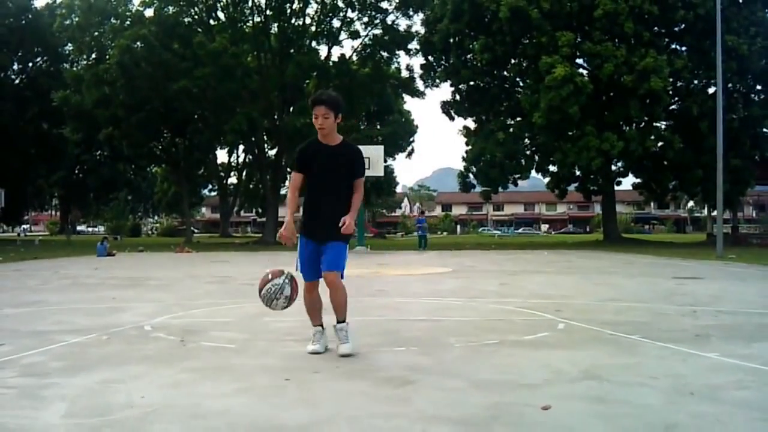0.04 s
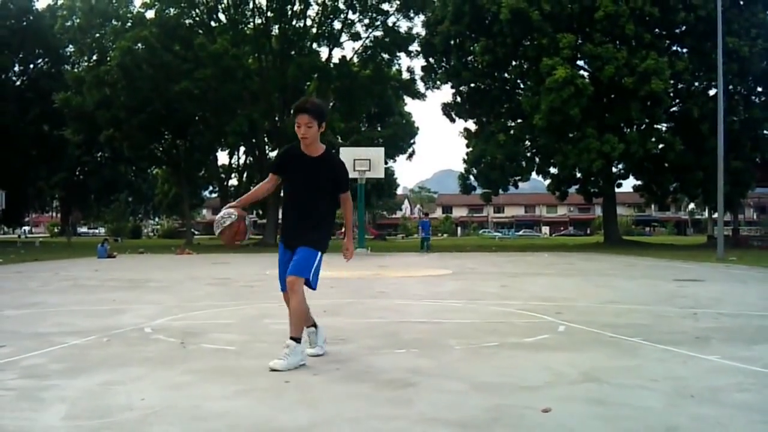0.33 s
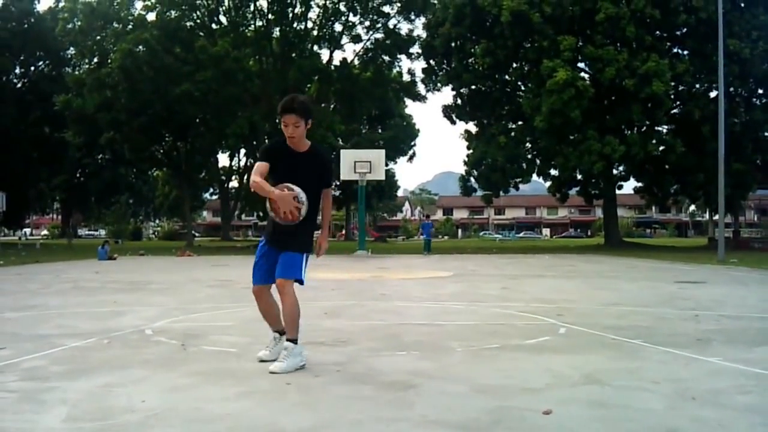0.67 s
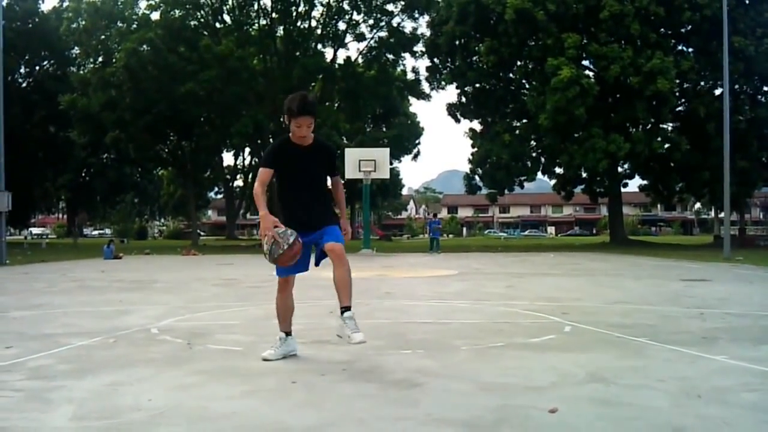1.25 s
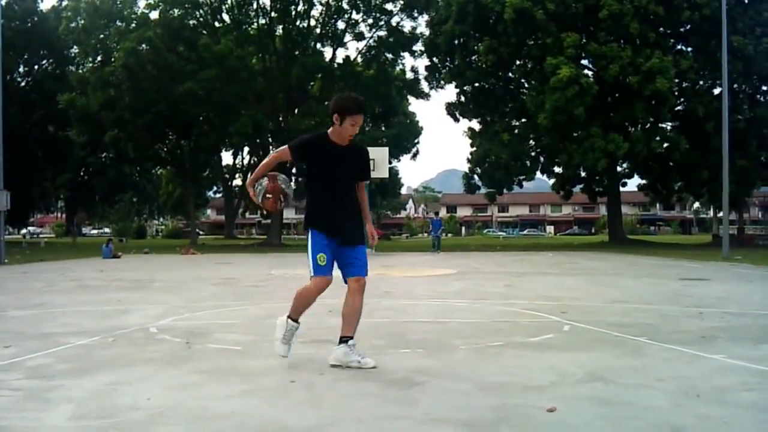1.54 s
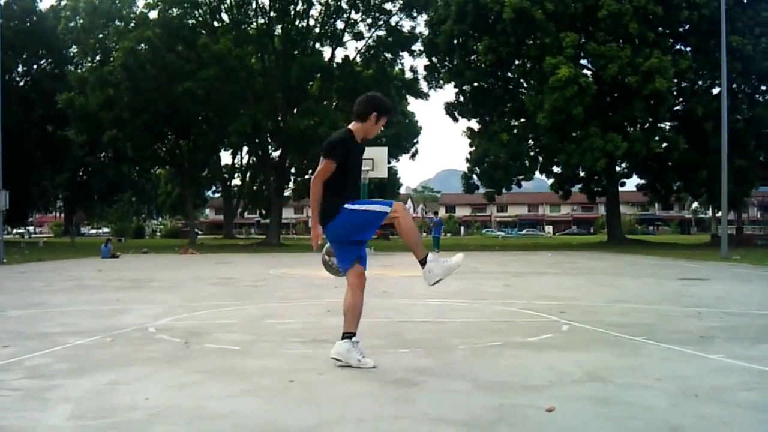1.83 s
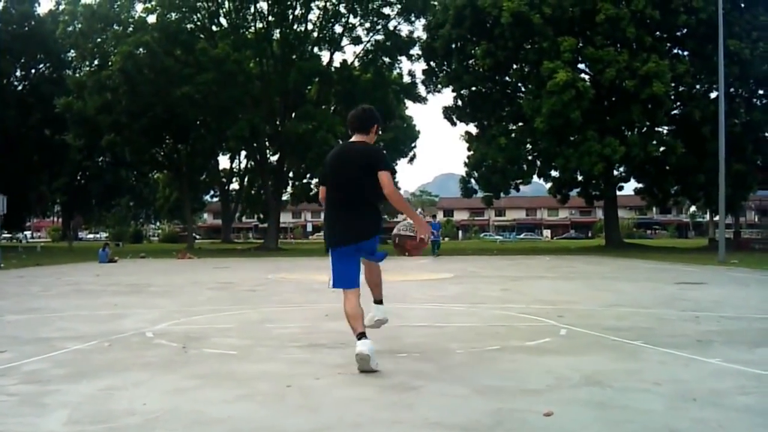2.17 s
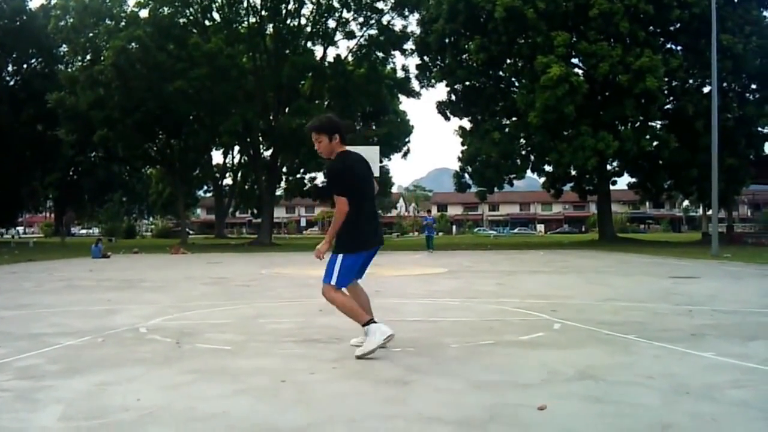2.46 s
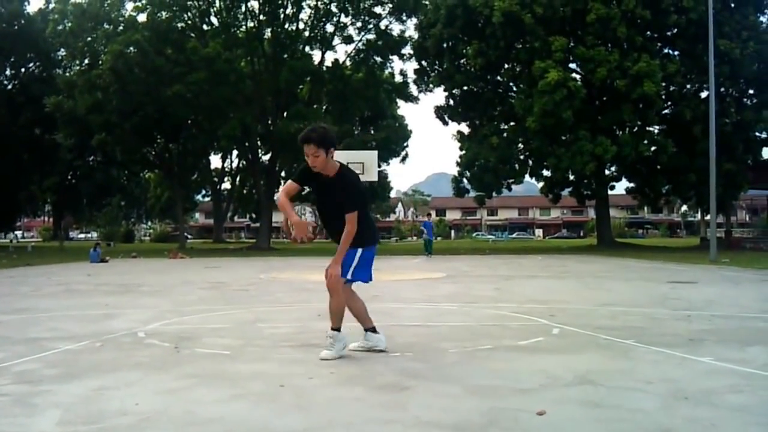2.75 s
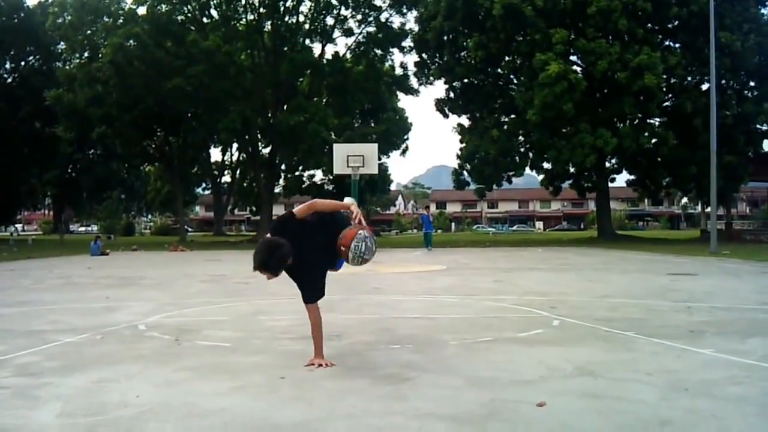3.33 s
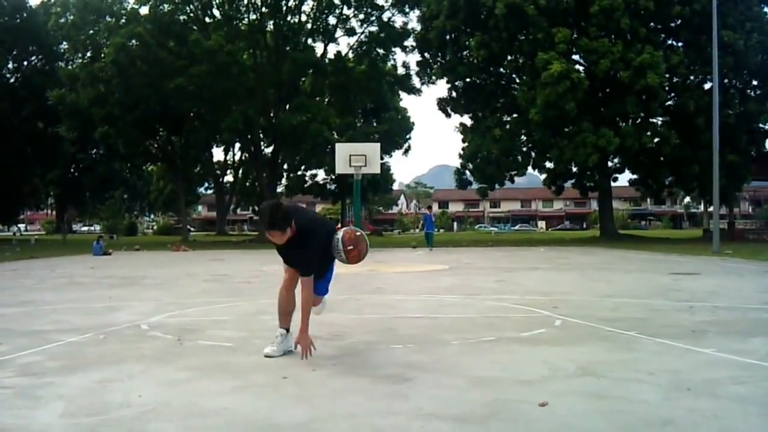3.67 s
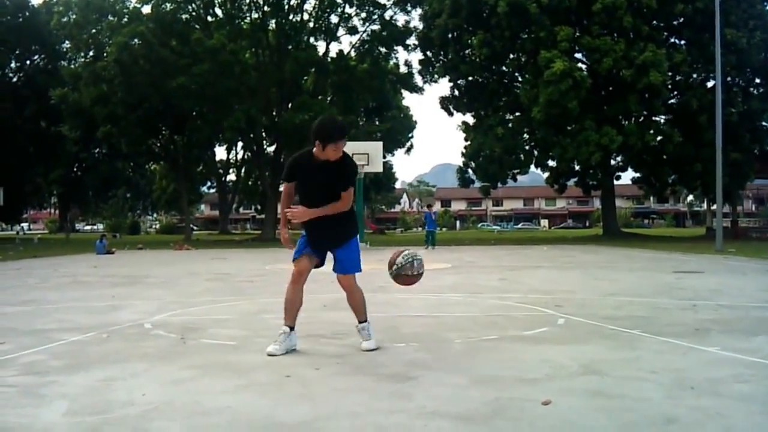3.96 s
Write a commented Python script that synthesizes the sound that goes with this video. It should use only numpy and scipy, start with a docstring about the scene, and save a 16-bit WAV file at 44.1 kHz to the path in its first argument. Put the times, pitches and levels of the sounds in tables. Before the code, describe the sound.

Basketball dribbled unevenly on concrete, shoes tapping and scuffing over distant traffic.

```python
"""Distant traffic rumbles and hums behind an open concrete court. A shoe steps and scuffs; trees return
a faint echo. From 0.4 s a basketball is dribbled through tricks, hands patting it between bounces. Each
bounce is a sharp slap, a thump as the ball squashes and springs back, a short shell note and a faint ping
of the air inside. A far tone falls at 0.9 s; an engine drone climbs and grows. After the third bounce
(2.2 s) shoes shuffle until the fourth (3.7 s). The level drops out briefly at 3.9 s."""
import sys
import numpy as np
from scipy import signal
from scipy.fft import rfft, irfft
from scipy.io import wavfile
from scipy.ndimage import uniform_filter1d

SR = 44100
rng = np.random.default_rng(int(sys.argv[2]) if len(sys.argv) > 2 else 0)


def unload_wav(signal):
    """Save mono or channel-first audio to the path in sys.argv[1] as 16-bit WAV at rate SR, clipped to [-1, 1]."""
    wavfile.write(
        sys.argv[1],
        SR,
        np.round(np.clip(np.atleast_2d(signal).T, -1, 1) * 32767).astype(np.int16),
    )


N = 176400
TREBLE_KNEE_HZ, TOP_HZ = 3170, 7300
FLEX_T60_S = 0.035
# rubber wall flexing in contact (frequency [Hz], level [dB], t60 [s])
WALL_MODES = [(303, -35, 0.06), (383, -29, 0.059), (620, -39, 0.014), (754, -31, 0.032), (1040, -34, 0.026),
              (1270, -32, 0.035), (1448, -25.5, 0.04), (2018, -33, 0.049)]


def undb(db):
    """Decibels to gain."""
    return 10 ** (np.asarray(db) / 20)


def add(out, start_s, sound):
    """Mix a sound in at start_s."""
    i = int(start_s * SR)
    out[i:i + len(sound)] += sound[:N - i]


def lowpass(x, hz):
    """Two-pole low-pass."""
    return signal.sosfilt(signal.butter(2, hz, fs=SR, output="sos"), x)


def colour(x, points, tilt_db_oct=0, size=2048):
    """Minimum-phase filter through (Hz, dB) points, tilted above the treble knee."""
    hz, db = np.array(points).T
    bins_hz = np.maximum(np.fft.rfftfreq(size, 1 / SR), 1)
    treble_oct = np.log2(np.clip(bins_hz, TREBLE_KNEE_HZ, TOP_HZ) / TREBLE_KNEE_HZ)
    gain = undb(np.interp(np.log(bins_hz), np.log(hz), db) + tilt_db_oct * treble_oct)
    cepstrum = irfft(np.log(gain))
    cepstrum[1:size // 2] *= 2
    cepstrum[size // 2 + 1:] = 0
    return signal.fftconvolve(x, irfft(np.exp(rfft(cepstrum))))[:len(x)]


def walk(rate_hz, size=N):
    """Smooth random wander, unit spread."""
    hold = int(SR / rate_hz)
    stairs = np.repeat(rng.standard_normal(size // hold + 1), hold)
    wander = uniform_filter1d(uniform_filter1d(stairs, hold), hold)[:size]
    return wander / wander.std()


def ring(modes, wobble=1):
    """Decaying sines from (Hz, dB, t60 s) rows; wobble scales pitch."""
    t = np.arange(SR) / SR
    clock_s = np.cumsum(np.ones(SR) * wobble) / SR
    return sum(undb(db - 60 * t / t60_s) * np.sin(2 * np.pi * hz * clock_s) for hz, db, t60_s in modes)


def burst(t60_s):
    """Decaying noise, unit energy."""
    t = np.arange(SR // 4) / SR
    noise = rng.standard_normal(len(t)) * undb(-60 * t / t60_s)
    return noise / np.sqrt(np.sum(noise ** 2))


def click():
    """Pressure spike of first contact."""
    return -signal.unit_impulse(SR // 4)


def swell(t, middle_s, half_s):
    """Rounded rise, hold and fall."""
    return np.exp(-((t - middle_s) / half_s) ** 4)


def traffic(t):
    """Distant road rumble."""
    spectrum = [(13, -50), (22, -11), (32, -20.5), (65, -2.5), (120, -1.5), (340, -15), (384, -16),
                (489, -23), (775, -21.5), (987, -22), (1170, -23), (1850, -30.5), (2040, -32),
                (3400, -32.5), (7200, -41), (9360, -79), (15800, -120)]  # (frequency [Hz], gain [dB])
    levels = [(0, -44.5), (1.0, -44.5), (2.0, -44), (2.6, -44), (3.3, -43.5), (4.0, -43)]  # (time [s], level [dB])
    rumble = colour(rng.standard_normal(N), spectrum, size=8192) * undb(0.34 * walk(rate_hz=5))
    return rumble / rumble.std() * undb(np.interp(t, *np.array(levels).T))


def engine(t):
    """Far engine: its drone climbs and grows as it gathers speed."""
    run_up = [(0, 352, -66.5), (1.1, 361.2, -60), (1.5, 367.7, -53.5), (2.0, 374.2, -57), (2.3, 376, -58),
              (2.55, 385.6, -51), (3.1, 390.3, -52), (3.65, 395.3, -50), (4.0, 399, -51.5)]  # (time [s], pitch [Hz], level [dB])
    harmonics = [(1, -1), (2, -12.5), (3, -14)]  # (harmonic number, gain [dB])
    times_s, hz, level_db = np.array(run_up).T
    waver = 1 + 0.002 * walk(rate_hz=12) + 0.005 * walk(rate_hz=90)
    phase = 2 * np.pi * np.cumsum(np.interp(t, times_s, hz) * waver) / SR
    drone = sum(undb(db + 0.71 * walk(rate_hz=13)) * np.sin(k * phase) for k, db in harmonics)
    return drone * undb(np.interp(t, times_s, level_db))


def hum(t):
    """Low throbbing hum from far off."""
    centre_hz, level_db = 122.3, -55.5
    band = lowpass(rng.standard_normal(N), hz=20) * np.sin(2 * np.pi * centre_hz * t)
    return undb(level_db) * band / band.std()


def steps():
    """Rubber soles tap concrete with a short hollow knock."""
    landings = [(.048, -9.5, -2), (0.96, -10, 2), (1.6615, 2, -.5), (1.6645, -6, 2.5), (2.8495, -8.5, -4.5),
                (3.034, -12, -6), (3.394, -12.5, -2), (3.486, -16, 7)]  # (time [s], gain [dB], treble tilt [dB/oct])
    tap_spectrum = [(80, 1), (300, -4), (700, -1.5), (1200, -5.5), (2000, -19), (4000, -13), (7000, -25.5)]  # (frequency [Hz], gain [dB])
    knock_modes = [(215, -35.5, 0.072), (380, -42.5, .025), (654, -36, 0.022), (980, -39, 0.012),
                   (1280, -40.5, 0.018)]  # (frequency [Hz], level [dB], t60 [s])
    out = np.zeros(N)
    for at_s, db, tilt_db_oct in landings:
        tap = click() + undb(-4.5) * burst(t60_s=0.024)
        add(out, at_s, undb(db - 2) * colour(tap, tap_spectrum, tilt_db_oct))
        add(out, at_s, -undb(db) * ring(knock_modes))
    return out


def scuffs(t):
    """Soles and clothes rub as the player turns: swells of gritty hiss and lower rasp."""
    rubs = [(0.095, 0.031, -0.5, -10), (0.505, 0.031, -9.5, -16), (0.904, 0.027, -10.5, -8),
            (0.982, 0.052, -12.5, -15.5), (2.327, 0.055, -6.5, -9.5), (2.443, .05, -6, -10),
            (2.521, 0.043, -1.5, -7), (2.587, .015, -6, 0), (2.669, 0.027, -8, -14),
            (2.714, 0.014, -5.5, -8), (2.801, 0.021, -4, 2), (2.874, 0.094, -12, -5),
            (3.047, 0.064, -10, -7), (3.395, 0.015, -3, 0.5), (3.831, .05, -16.5, -20.5)]  # (middle [s], half length [s], hiss gain [dB], rasp gain [dB])
    hiss_spectrum = [(300, -9), (1000, 2.5), (2000, -8.5), (3000, -1), (4500, -2), (6500, 3.5), (7500, -5)]  # (frequency [Hz], gain [dB])
    rasp_spectrum = [(500, -21.5), (1400, -11.5), (1900, 5.5), (2400, -2.5), (3200, -11.5), (7000, -32.5)]  # (frequency [Hz], gain [dB])

    def friction(spectrum, db):
        grit = rng.standard_normal(N) * undb(3 * walk(rate_hz=460))
        noise = lowpass(colour(grit, spectrum), TOP_HZ)
        return undb(db) * noise / noise.std()

    hiss, rasp = friction(hiss_spectrum, db=-48), friction(rasp_spectrum, db=-57.5)
    return sum(swell(t, middle_s, half_s) * (undb(hiss_db) * hiss + undb(rasp_db) * rasp)
               for middle_s, half_s, hiss_db, rasp_db in rubs)


def echo(x):
    """Weak, late, dull scatter from the trees round the court."""
    rise_s, t60_s = 0.12, 0.9
    t = np.arange(SR) / SR
    tail = rng.standard_normal(SR) * (1 - np.exp(-(t / rise_s) ** 2)) * undb(-60 * t / t60_s)
    tail /= np.sqrt(np.sum(tail ** 2))
    return undb(-23.5) * signal.fftconvolve(x, lowpass(tail, hz=3050))[:N]


def bounces():
    """Ball on concrete: slap, rattle, thump, notes pitched by the spot that lands, then lift-off."""
    # ground hits (time [s], thump gain [dB], slap gain [dB], treble tilt [dB/oct], rattle gain [dB],
    # belly note [Hz], belly gain [dB], wall flex [Hz], flex gain [dB], skin ping [Hz], skin gain [dB],
    # wall ring gain [dB], lift-off gain [dB])
    hits = [(.3890, 0, 5.5, -14, -1.5, 308, -17, 1430, -9, 3420, -12, -4.5, 0),
            (1.3390, -2.5, 3, -.5, -1.5, 395, -12, 920, 1.5, 3140, -6, -3, -3.5),
            (2.204, -3, -1.5, 0, -7, 293, -7, 560, -13, 3340, -5, -9.5, -6),
            (3.7439, -1, 6.5, 1.5, 0, 225, -.5, 740, 0.5, 4030, 1, -4, -2)]
    slap_spectrum = [(100, -13), (500, -12.5), (900, -2), (1400, -9), (2000, -4), (2800, -2), (3600, -1),
                     (5000, 0), (6200, 3.5), (7200, -6.5)]  # (frequency [Hz], gain [dB])
    rubber_spectrum = [(100, -21), (500, -8.5), (850, 8.5), (1350, 3), (2000, -9), (3300, 0), (5000, -2.5),
                       (7000, -5.5)]  # (frequency [Hz], gain [dB])
    shell_modes = [(414.4, -30, 0.092), (373, -42, 0.22), (520, -42.5, 0.13)]  # ring after lift-off (frequency [Hz], level [dB], t60 [s])
    belly_t60_s, skin_t60_s, lift_off_s = 0.041, 0.024, 0.01
    out = np.zeros(N)
    for (at_s, thump_db, slap_db, tilt_db_oct, rattle_db, belly_hz, belly_db,
         flex_hz, flex_db, skin_hz, skin_db, wall_db, lift_db) in hits:
        add(out, at_s, undb(slap_db + 4.5) * colour(click(), slap_spectrum, tilt_db_oct))
        add(out, at_s, undb(rattle_db + 4) * colour(burst(t60_s=0.03), rubber_spectrum, tilt_db_oct))
        add(out, at_s, undb(thump_db - 18) * squash(contact_s=0.0152))
        spot_modes = [(belly_hz, belly_db - 18, belly_t60_s),
                      (flex_hz, flex_db - 23.5, FLEX_T60_S),
                      (skin_hz, skin_db - 22, skin_t60_s)]
        add(out, at_s, -ring(spot_modes))
        add(out, at_s, undb(thump_db) * cavity() - undb(wall_db) * ring(WALL_MODES))
        release = colour(lowpass(burst(t60_s=0.029), hz=2600), rubber_spectrum, tilt_db_oct=-10)
        add(out, at_s + lift_off_s, undb(lift_db) * release)
        add(out, at_s + lift_off_s, undb(thump_db) * ring(shell_modes))
    return out


def squash(contact_s):
    """Ball flattens and springs back: one pressure swing, as long as the contact."""
    thump_hz = 114.5
    t = np.arange(int(contact_s * SR)) / SR
    envelope = np.sqrt(np.sin(np.pi * t / contact_s))
    return -envelope * np.cos(2 * np.pi * thump_hz * (t - contact_s / 2))


def cavity():
    """Air inside shimmers as the ball wobbles; mode levels vary from strike to strike."""
    air_modes = [(972, -45, 0.38), (1560, -44, 0.073), (2050, -56, .15), (2686, -58, 0.42),
                 (2815, -57, 0.42), (3117, -61, 0.4), (3219, -60, 0.42), (3461, -55, .45), (3731, -60, .42)]  # (frequency [Hz], level [dB], t60 [s])
    out = np.zeros(SR)
    for hz, db, t60_s in air_modes:
        scatter_db = rng.uniform(-2.8, 2)
        out += ring([(hz, db + scatter_db, t60_s)], wobble=1 + 0.007 * walk(rate_hz=200, size=SR))
    return out


def pats_and_tap():
    """Light impacts: small clap with a duller tail, shallow thump, hollow body note, weak ring."""
    # hand pats on the ball, and one sharp tap at 2.51 s, probably a shoe step
    # (time [s], thump gain [dB], clap gain [dB], treble tilt [dB/oct], ring gain [dB],
    # body note [Hz], body gain [dB], flex note [Hz], flex gain [dB])
    impacts = [(.6220, 4.5, -4.5, 0.5, -9, 187, -2.5, 1250, -11),
               (1.1992, 2, -1.5, 2.5, -4, 229, 0, 900, -8),
               (1.7900, -6.5, -2.5, -3.5, -2.5, 242, 1, 1334, -3),
               (2.494, 2.5, -2, -1.5, 5, 226, 3.5, 710, -0.5),
               (2.5102, -16, 2.5, 1.5, 0.5, 380, -10, 898, 0),
               (3.1732, 3.5, -1.5, -1, 1.5, 255, 3.5, 1290, 2.5),
               (3.7185, 4, 6, 5.5, 3.5, 368, 6.5, 1006, 8.5)]
    clap_spectrum = [(100, -8), (500, 4.5), (800, 1.5), (1300, -3), (2000, -9.5), (3800, -5), (5500, -6),
                     (7000, -11)]  # (frequency [Hz], gain [dB])
    tail_spectrum = [(100, -4.5), (500, 2.5), (900, 4), (1350, 0.5), (2000, -8.5), (3500, -10.5),
                     (7000, -15)]  # (frequency [Hz], gain [dB])
    skin_modes = [(3500, -41, 0.015), (3960, -51, 0.018)]  # struck rubber (frequency [Hz], level [dB], t60 [s])
    body_t60_s = 0.033
    out = np.zeros(N)
    for at_s, thump_db, clap_db, tilt_db_oct, ring_db, body_hz, body_db, flex_hz, flex_db in impacts:
        clap = colour(click(), clap_spectrum, tilt_db_oct) + colour(burst(t60_s=0.039), tail_spectrum)
        add(out, at_s, undb(clap_db - 6.5) * clap)
        add(out, at_s, -undb(clap_db) * ring(skin_modes))
        add(out, at_s, undb(thump_db - 40.5) * squash(contact_s=0.015))
        spot_modes = [(body_hz, body_db - 28.5, body_t60_s), (flex_hz, flex_db - 37, FLEX_T60_S)]
        add(out, at_s, -ring(spot_modes))
        add(out, at_s, undb(ring_db - 12.5) * cavity() - undb(ring_db - 17.5) * ring(WALL_MODES))
    return out


def far_tone(t):
    """One short, faint, falling tone from far off."""
    middle_s, middle_hz, glide_hz_per_s = 0.905, 950, -230
    pitch_hz = (middle_hz + glide_hz_per_s * (t - middle_s)) * (1 + 0.016 * walk(rate_hz=99))
    return undb(-55) * swell(t, middle_s, half_s=0.075) * np.sin(2 * np.pi * np.cumsum(pitch_hz) / SR)


def dropout(t):
    """Gain that cuts all sound briefly."""
    start_s, end_s, depth_db = 3.921, 3.967, -56
    gate = 1.0 * ((t > start_s) & (t < end_s))
    return undb(depth_db * uniform_filter1d(gate, size=300))


def scene():
    """Ball and player, their echo and the distant background; mono."""
    t = np.arange(N) / SR
    play = bounces() + pats_and_tap() + steps() + scuffs(t)
    mix = play + echo(play) + traffic(t) + engine(t) + hum(t) + far_tone(t)
    return (mix * dropout(t))[None]


def record(dry):
    """Steep zero-phase treble cut; clicks stay sharp."""
    return signal.sosfiltfilt(signal.ellip(7, 0.1, 32, TOP_HZ, fs=SR, output="sos"), dry)


dry = scene()
out = record(dry)
unload_wav(out)
```